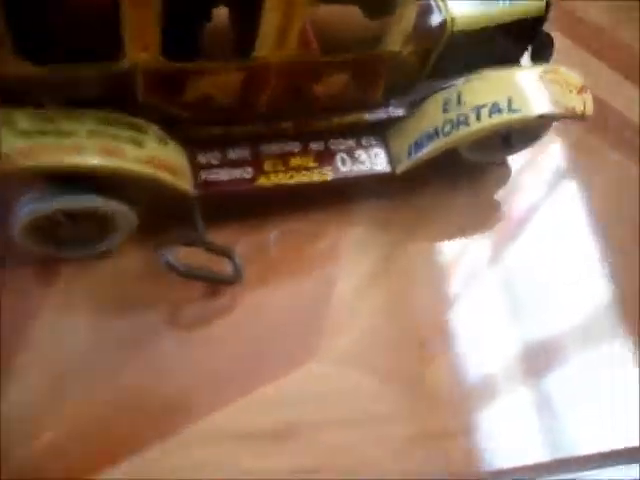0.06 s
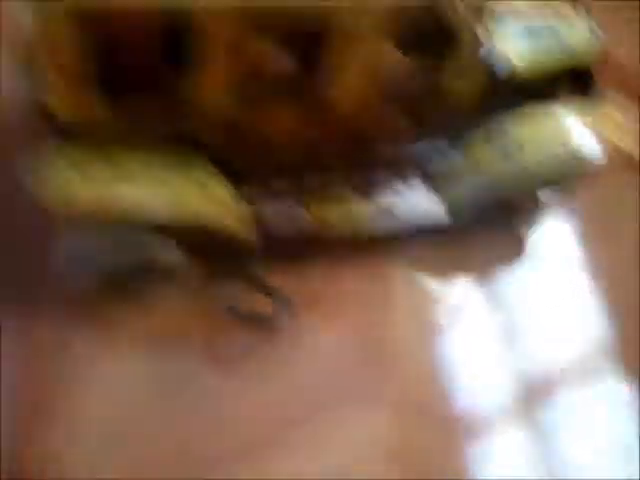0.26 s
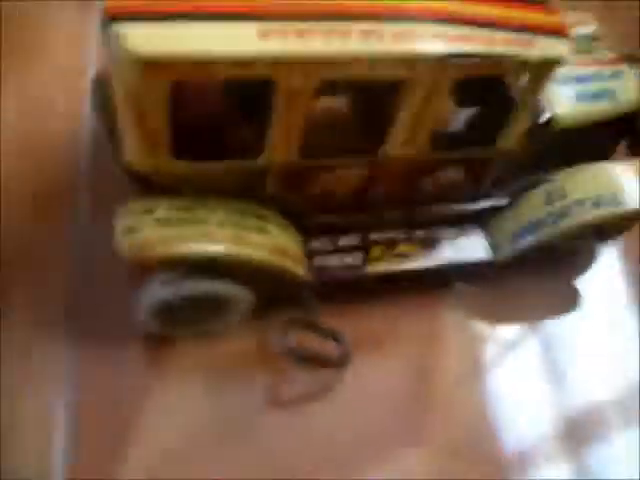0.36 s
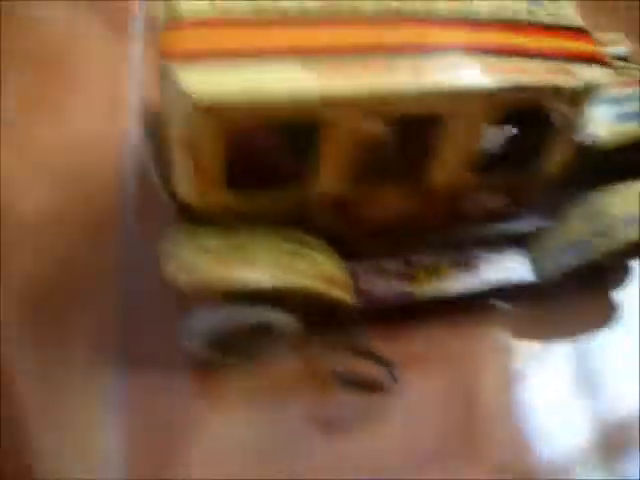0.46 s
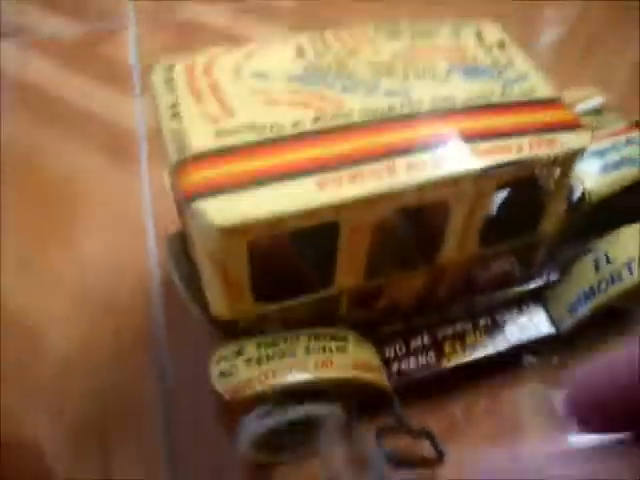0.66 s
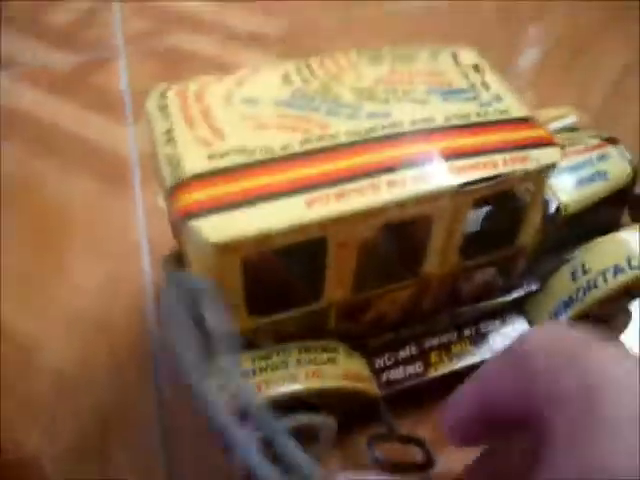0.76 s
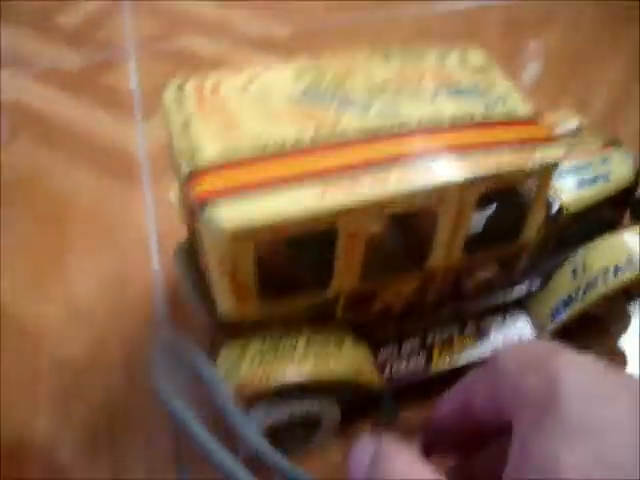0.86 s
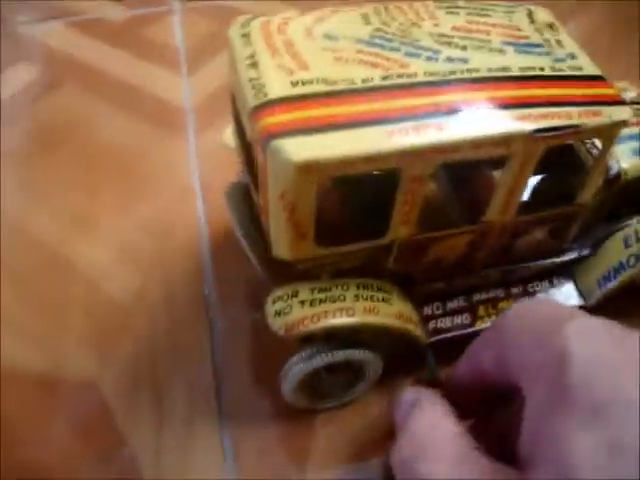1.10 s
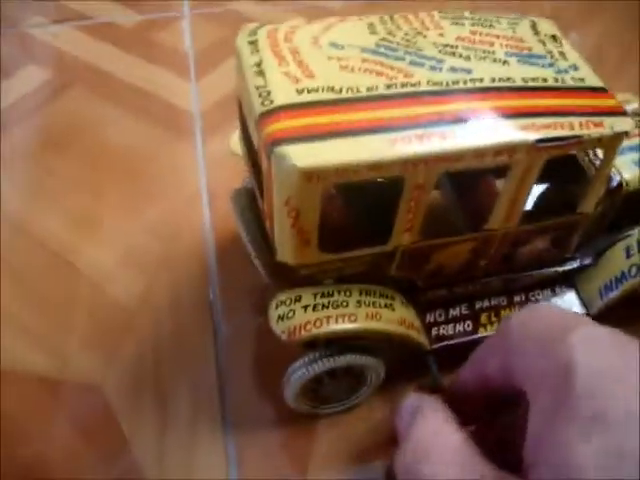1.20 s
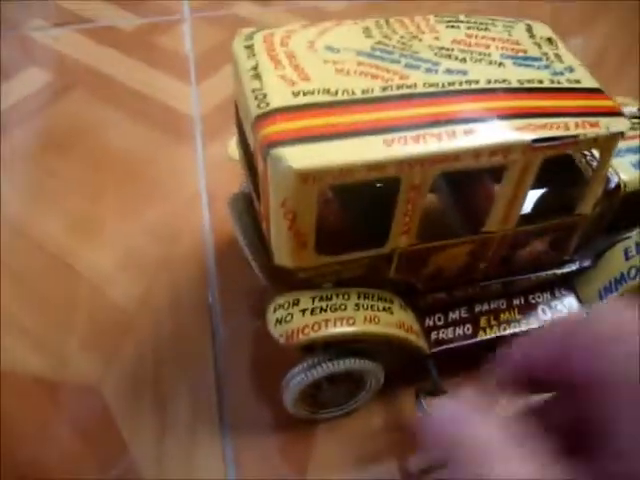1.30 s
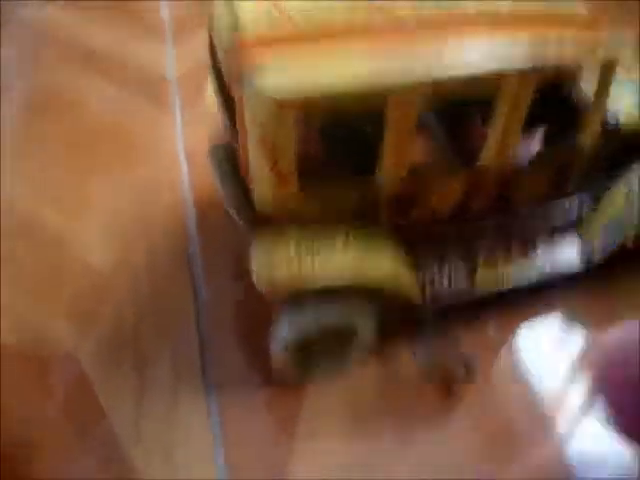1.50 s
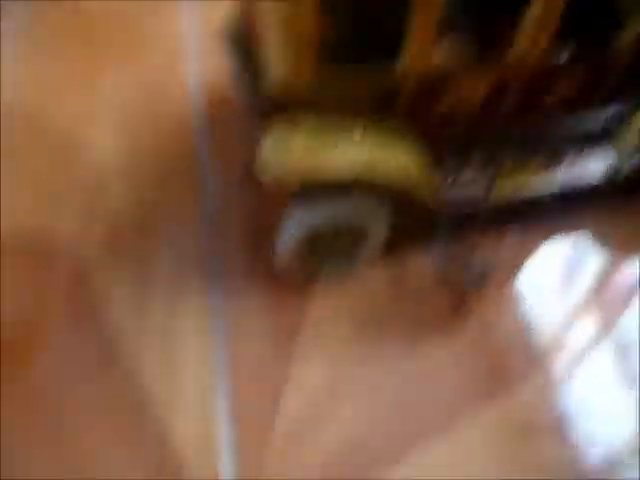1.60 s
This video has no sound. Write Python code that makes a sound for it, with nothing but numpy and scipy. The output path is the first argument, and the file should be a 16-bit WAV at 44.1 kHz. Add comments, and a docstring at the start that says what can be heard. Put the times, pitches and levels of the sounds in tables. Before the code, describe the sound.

Dry clicks and knocks of handling, then fainter tinny taps on a small metal toy indoors

```python
"""A tin toy car is handled on a wooden floor in a quiet room, close to a hand-held microphone.
First come dry clicks, probably the grip shifting on the microphone's casing: damped modes with grit noise.
Then fingers rub (wavering coloured noise) and tap the toy's wire key; the tin rattles and rings (noise and
modes), and the steel key and its works tick and ping (single modes). During the later taps a soft low tone
comes and goes (a sine). Low, nearly steady room noise with some hiss lasts throughout."""
import sys
import numpy as np
from scipy import signal
from scipy.fft import rfft, irfft, next_fast_len
from scipy.io import wavfile
from scipy.ndimage import map_coordinates

SR = 44100
rng = np.random.default_rng(int(sys.argv[2]) if len(sys.argv) > 2 else 0)


def put_to_file(sound):
    """Save the sound as 16-bit audio at rate SR, in the file named by the first command-line argument."""
    columns = np.atleast_2d(sound).T  # one column per channel
    safe = np.clip(columns, -1, 1)
    whole_steps = np.round(safe * 32767)
    wavfile.write(sys.argv[1], SR, whole_steps.astype(np.int16))


N = 72765
BAND_HZ = 3930  # upper edge of the narrow band


def amp(db):
    """Level to amplitude: 20 dB is a factor of ten."""
    return 10 ** (np.asarray(db) / 20)


def unit(x):
    """Normalisation of the mean power: x scaled to rms 1."""
    return x / np.sqrt(np.mean(x ** 2) + 1e-20)


def filtered(x, response):
    """Linear filtering: the spectrum of x is multiplied by a response of frequency."""
    size = next_fast_len(x.shape[-1] + 8192)
    spectrum = rfft(x, size) * response(np.fft.rfftfreq(size, 1 / SR))
    return irfft(spectrum, size)[..., :x.shape[-1]]


def low_cut(x, hz):
    """Radiation efficiency: bodies small against the wavelength radiate little bass."""
    return signal.sosfilt(signal.butter(2, hz, "highpass", fs=SR, output="sos"), x)


def noise(points, tilt_db=0):
    """Spectral shaping: white noise takes a colour at rms 1, then a tilt in dB per octave about 1 kHz."""
    f, db = np.transpose(points)

    def colour(hz):
        level_db = np.interp(np.log(hz + 1), np.log(f + 1), db)
        return amp(level_db) * (hz < BAND_HZ + 200)

    coloured = unit(filtered(rng.standard_normal(N), colour))
    # the tilt stays constant below 500 Hz
    return filtered(coloured, lambda hz: amp(tilt_db * np.log2(np.maximum(hz, 500) / 1000)))


def wobble(rate):
    """Slow random modulation: a smooth curve through random knots, rate of them a second."""
    return map_coordinates(rng.standard_normal(400), [np.arange(N) * rate / SR], mode="wrap")


def since(s):
    """Causality: seconds since an onset, zero before it."""
    return np.maximum(np.arange(N) / SR - s, 0)


def ring(modes, t, length=1):
    """Modal superposition: a sum of sines, each decaying by 60 dB in t60 * length."""
    return sum(amp(db - 60 * t / (t60 * length)) * np.sin(2 * np.pi * hz * t) for hz, db, t60 in modes)


def casing_clicks():
    """Modal excitation: each contact drives the casing's short-lived modes in its own mix, with slip noise."""
    # dry clicks; both ratios act on the knock modes, the pitch ratio also shortens their decay:
    # start_s, knock_db, pitch_ratio, length_ratio, snap_db, thud_db, grit_db
    clicks = [(0.2105, -1, .99, 0.87, -44.5, -25.5, -26.5), (0.2173, -14, 1.1, 2, -0.5, -50.5, -21),
              (0.3632, -1.5, 1.1, 0.4, -26, -29.5, -27), (0.3883, -18, .96, 0.56, -22, -16, -15.5),
              (0.3921, -20.5, 0.74, 0.5, -31, -22.5, -31.5), (0.3984, -8.5, .95, 1.22, -30, -14.5, -17),
              (0.4023, -24.5, 0.93, 1.45, -32.5, -30.5, -23.5), (.6045, -24.5, 1.042, 1.13, -36, -58, -40)]
    # main knock of the casing, before the ratios: frequency_hz, level_db, t60_s
    knock_modes = [(647, -16, .014), (865, -15, 0.033), (1019, -2, 0.025), (1273, -9.5, 0.0082)]
    # snap of a hard contact: frequency_hz, level_db, t60_s
    snap_modes = [(1640, -2.5, 0.0045), (2250, 1.5, 0.0058), (2690, -14.5, 0.013), (3220, -16.5, 0.021)]
    # hollow thud of the casing: frequency_hz, level_db, t60_s
    thud_modes = [(270, -10, 0.031), (561, -3.5, 0.045), (682, -2, 0.028), (770, -15, 0.037)]
    # colour of the grit as a contact slips: frequency_hz, level_db
    grit_colour = [(200, -15.5), (400, -19), (650, 11.5), (1200, 7.5), (1700, -1.5), (2300, 4), (2650, 5),
                   (2950, 4.5), (3200, 1), (3400, -4), (3900, -14.5)]
    # the hardest click also jolts the microphone: start_s, level_db, frequency_hz, t60_s
    jolt_table = [(0.2192, -27, 101, 0.047)]
    rise_s = 0.00039
    grit_t60_s, grit_tail_db, grit_tail_t60_s = 0.018, -18, 0.073
    casing_low_hz, snap_low_hz = 195, 750  # little of the casing sounds below the first; the snap is kept above the second

    knocks, snaps = np.zeros((2, N))
    for s, knock_db, pitch, length, snap_db, thud_db, grit_db in clicks:
        t = since(s)
        knock = amp(knock_db) * ring(knock_modes, t * pitch, length)
        thud = amp(thud_db) * ring(thud_modes, t)
        slip = amp(-60 * t / grit_t60_s) + amp(grit_tail_db - 60 * t / grit_tail_t60_s)
        grit = amp(grit_db) * slip * noise(grit_colour)
        knocks += (knock + thud + grit) * (1 - np.exp(-t / rise_s))
        snaps += amp(snap_db) * ring(snap_modes, t)
    jolts = sum(ring([(hz, db, t60)], since(s)) for s, db, hz, t60 in jolt_table)
    return low_cut(knocks, casing_low_hz) + low_cut(snaps, snap_low_hz) + jolts


def tin_taps():
    """Impact excitation: a tap gives short contact noise, the tin's modes and a rattle fading in the room."""
    # taps on the toy; sustain is the level of ring and rattle against the contact:
    # start_s, level_db, tilt_db_per_octave, sustain_db
    taps = [(.911, -40, -1.5, 4.5), (.933, -28.5, -3, -5), (.947, -33.5, -9.5, 2), (.988, -36, -6, 5),
            (1.037, -31, -8, 2), (1.077, -26.5, -5.5, 0.5), (1.121, -39.5, -22.5, -1),
            (1.2385, -27, -6, 0.5), (1.2613, -22, 4.5, -1.5), (1.2755, -23, -0.5, -3.5),
            (1.298, -30.5, 4, 0.5), (1.583, -45, 3, -5)]
    # modes of the tin body, before tilt and scatter: frequency_hz, level_db, t60_s
    tin_modes = [(694, -7, 0.2), (878, -14, 0.13), (959, 0, 0.24), (1003, -9.5, 0.24), (1280, -4, 0.15),
                 (1484, -18.5, 0.48), (1782, -16.5, 0.44), (1997, -14.5, 0.39), (2293, -7.5, 0.082),
                 (2465, -18, 0.43), (2790, -36.5, .2), (3190, -30.5, 0.16), (3610, -34, 0.28)]
    # colour of contacts and loose rattle in the room, before tilt: frequency_hz, level_db
    clatter_colour = [(100, -24), (400, -9), (700, 3.5), (1000, 11.5), (1400, -5), (1900, 0.5),
                      (2450, -2.5), (3200, -6.5), (3900, -26)]
    ring_db, contact_db, contact_t60_s = -6.5, -7, 0.046
    rattle_db, rattle_t60_s = -14.5, 0.29
    tin_low_hz = 345  # little is radiated below this

    out = np.zeros(N)
    for s, db, tilt_db, sustain_db in taps:
        t = since(s)
        # each tap scatters the pitch and level of the modes a little
        scatter = rng.standard_normal((len(tin_modes), 2))
        modes = []
        for (hz, level_db, t60), (a, b) in zip(tin_modes, scatter):
            mode_db = level_db + tilt_db * np.log2(hz / 1000) + 2 * b
            modes.append((hz * (1 + .002 * a), mode_db, t60))
        contact = amp(contact_db - 60 * t / contact_t60_s)
        rattle = amp(sustain_db + rattle_db - 60 * t / rattle_t60_s)
        clatter = (t > 0) * (contact + rattle) * noise(clatter_colour, tilt_db)
        out += amp(db) * (amp(sustain_db + ring_db) * ring(modes, t) + clatter)
    return low_cut(out, tin_low_hz)


def key_pings():
    """Modal excitation of steel by steel: one bright damped mode for each contact."""
    # ticks and a ping of the steel key and its works: start_s, level_db, frequency_hz, t60_s
    ping_table = [(1.212, -32.5, 3380, 0.018), (1.2613, -17, 2520, 0.013), (1.286, -38.5, 1997, 0.51)]
    rise_s = 0.0011

    out = np.zeros(N)
    for s, db, hz, t60 in ping_table:
        t = since(s)
        out += ring([(hz, db, t60)], t) * (1 - np.exp(-t / rise_s))
    return out


def rubbing(rough_db=2):
    """Friction noise: fingers slide unevenly on the key and the body, so the level wavers."""
    # course of the rubbing, before the roughness: time_s, level_db
    rub_level = [(.84, -53.5), (0.932, -42.5), (0.998, -45), (1.06, -40), (1.141, -41.5), (1.211, -46.5),
                 (1.32, -41.5), (1.449, -52), (1.571, -53.5), (1.65, -44)]
    # colour of the rubbing: frequency_hz, level_db
    rub_colour = [(150, -19), (300, 4.5), (350, 8), (450, 6), (520, -11), (700, -1), (790, -7.5),
                  (880, 1.5), (970, 0.5), (1060, -10.5), (1250, -2), (1400, -4), (1520, -2), (1750, -8.5),
                  (2400, -9), (3800, -22)]
    level_db = np.interp(np.arange(N) / SR, *np.transpose(rub_level))
    return amp(level_db + rough_db * wobble(110)) * noise(rub_colour)


def hum():
    """Pure tone under an envelope: a soft low sine comes and goes in the background."""
    start_s, end_s, fade_s = 1.175, 1.335, 0.029
    tone_hz, level_db = 140.1, -44
    t = since(start_s)
    swell = np.clip(np.minimum(t, end_s - start_s - t) / fade_s, 0, 1)
    return amp(level_db) * swell * np.sin(2 * np.pi * tone_hz * t)


def room_noise(waver_db=1.2):
    """Stationary random noise: a low, nearly steady room sound with some hiss."""
    # course of the room noise, before the waver: time_s, level_db
    room_level = [(0, -42.5), (.18, -42), (.26, -43.5), (.52, -44), (.65, -42), (0.851, -43), (1.3, -42),
                  (1.65, -43.5)]
    # colour of the room noise: frequency_hz, level_db
    room_colour = [(25, -9.5), (50, -12.5), (70, -11), (105, -10.5), (150, -3), (205, 3.5), (260, 1),
                   (320, -5), (430, 1.5), (570, -5.5), (850, -7.5), (1500, -14), (1900, -17.5), (3200, -17),
                   (3850, -21)]
    level_db = np.interp(np.arange(N) / SR, *np.transpose(room_level))
    return amp(level_db + waver_db * wobble(14)) * noise(room_colour)


def scene():
    """Superposition: the pressures of all sources add at one microphone."""
    return (casing_clicks() + tin_taps() + key_pings() + rubbing() + room_noise() + hum())[None]


def record(dry):
    """Band limiting, then overload: peaks beyond full scale are clipped, which adds overtones."""
    overload, top_hz = 1.0, 16000
    narrow = filtered(dry, lambda hz: np.clip((BAND_HZ - hz) / 300 + .5, 0, 1))
    return filtered(np.clip(narrow, -overload, overload), lambda hz: hz < top_hz)


dry = scene()
out = record(dry)
put_to_file(out)
```